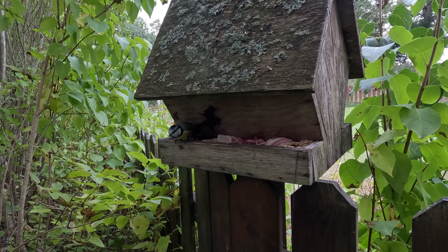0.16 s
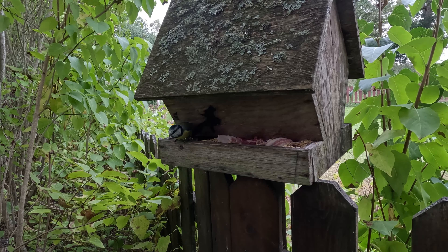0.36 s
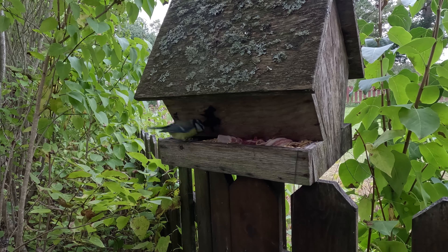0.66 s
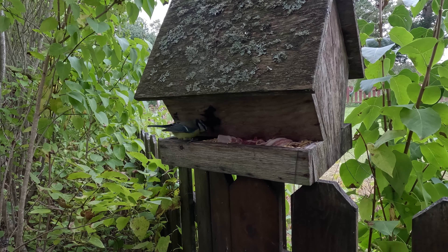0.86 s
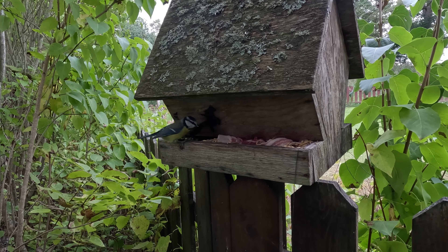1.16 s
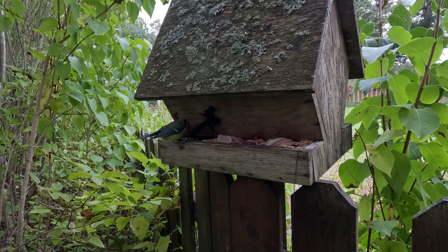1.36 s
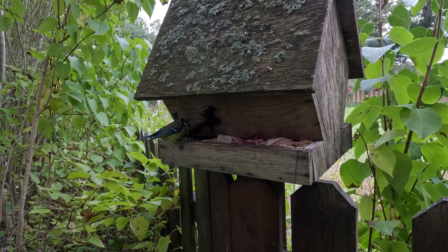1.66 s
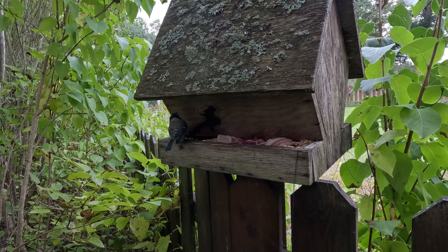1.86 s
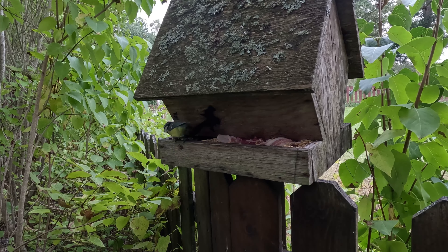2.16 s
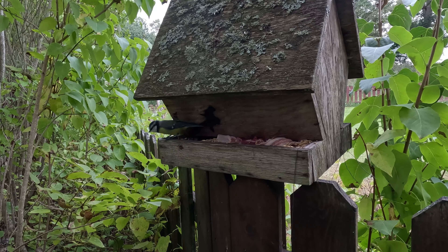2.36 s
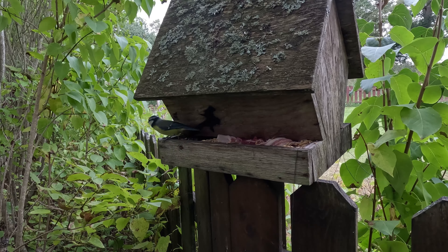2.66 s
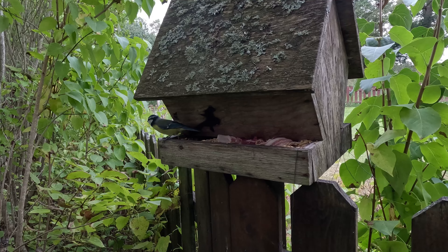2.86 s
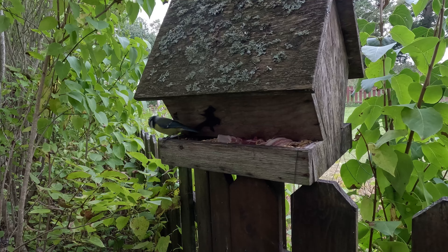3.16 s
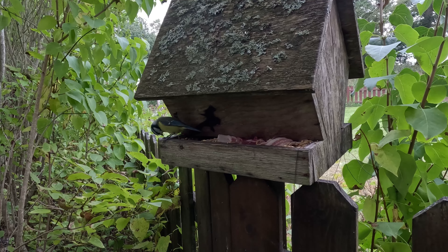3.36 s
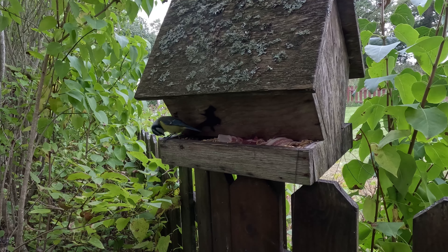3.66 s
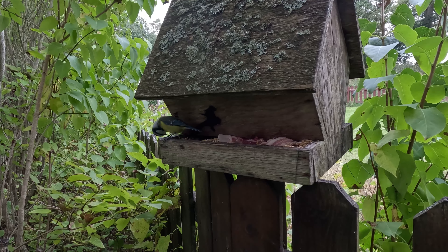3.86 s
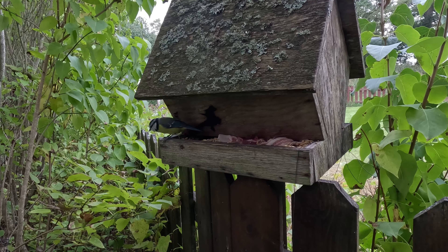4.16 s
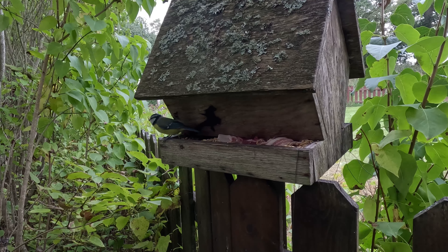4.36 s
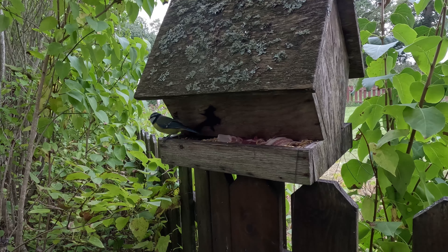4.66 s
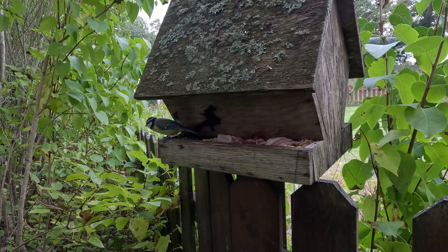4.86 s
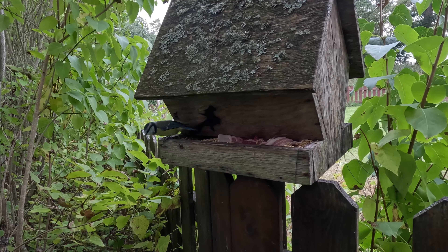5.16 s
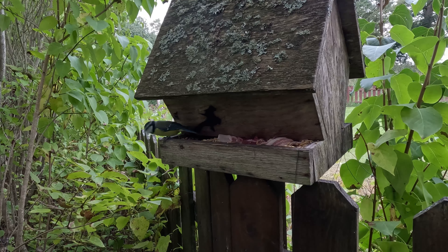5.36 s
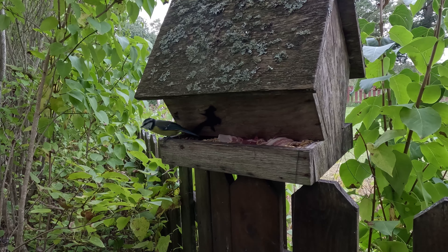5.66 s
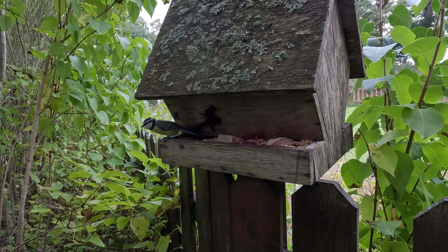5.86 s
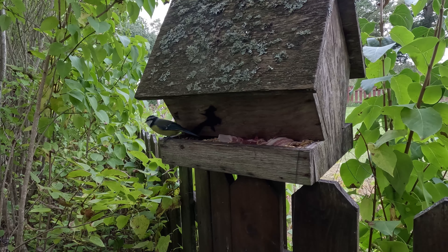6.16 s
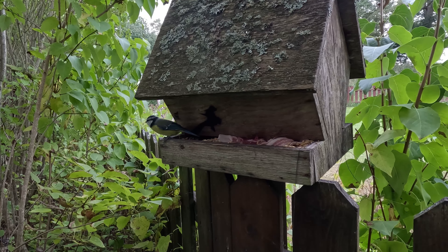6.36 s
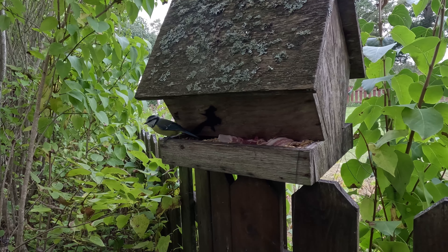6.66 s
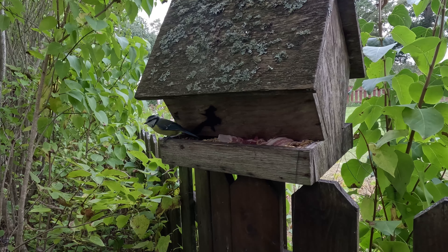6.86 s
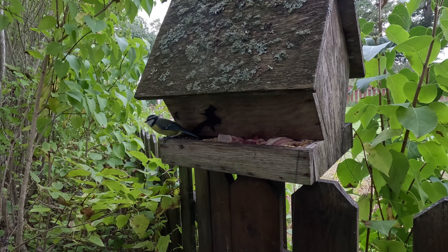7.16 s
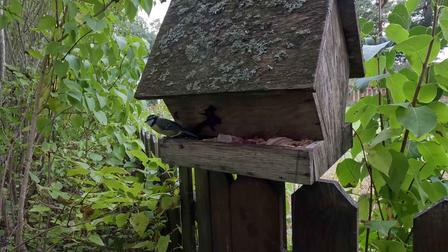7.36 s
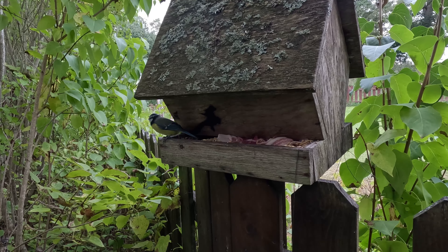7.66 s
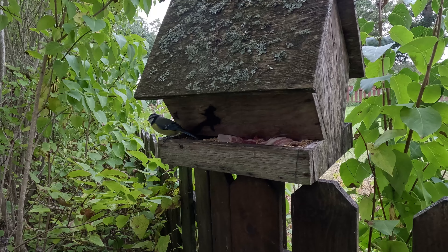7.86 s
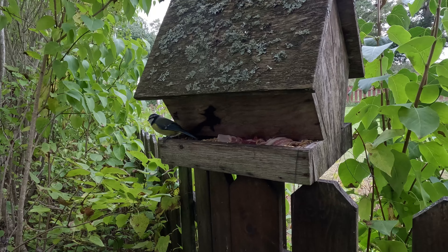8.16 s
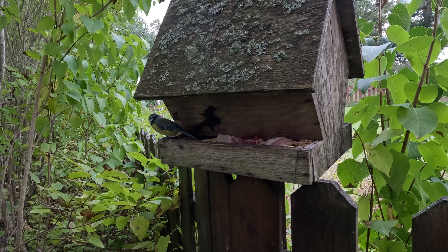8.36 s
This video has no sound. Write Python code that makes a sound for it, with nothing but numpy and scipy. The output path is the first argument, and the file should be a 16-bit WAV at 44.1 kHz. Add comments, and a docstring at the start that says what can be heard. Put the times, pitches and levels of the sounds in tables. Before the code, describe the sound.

Close by in a garden, a small bird pecks at food in a wooden feeder. Each peck is a sharp tick with a brief hollow ring, coming at uneven intervals. Between runs of pecks, feathers rustle, claws scuff the wood and seed husks crack, most busily just past the middle. The pecking pauses, then resumes near the end. Wind on the microphone and feeder jolts add low rumble and soft thumps over faint leaf hiss.

```python
"""Small bird at a wooden feeder

A bird pecks at food close by in a garden. Each peck is a sharp tick followed by the hollow ring of the
wooden box; feathers rustle, claws scuff and seed husks crack. Low rumble and thumps come from wind on the
microphone ports and from the bird shaking the feeder, over the faint hiss of leaves."""
import sys
import numpy as np
from scipy import signal
from scipy.io import wavfile
from scipy.ndimage import uniform_filter1d

SR = 44100
rng = np.random.default_rng(int(sys.argv[2]) if len(sys.argv) > 2 else 0)


def unload_audio(sound):
    """Save the sound as a 16-bit wav file, at the path given as the first command line argument."""
    columns = np.transpose(np.atleast_2d(sound))
    # keep every value between -1 and 1, then stretch to whole-number steps
    steps = np.round(np.clip(columns, -1, 1) * 32767)
    wavfile.write(sys.argv[1], SR, steps.astype(np.int16))


N = 374850


def gain_of(db):
    """Decibels to a gain."""
    return 10 ** (np.asarray(db) / 20)


def unit_rms(x):
    """Scales to rms 1."""
    return x / np.sqrt(np.mean(x ** 2) + 1e-20)


def curve_at(points, hz):
    """Reads a curve on a log-frequency axis."""
    f, value = np.transpose(points)
    return np.interp(np.log(hz + 1), np.log(f + 1), value)


def pan(db):
    """Left and right gains as two rows; positive dB leans left."""
    return gain_of(np.vstack([db, -db]) / 2)


def add(mix, s, sound):
    """Mixes a sound in at s seconds."""
    part = mix[:, round(s * SR):][:, :sound.shape[1]]
    part += sound[:, :part.shape[1]]


def wander(size):
    """Smooth random drift with rms 1, changing over about `size` samples."""
    return unit_rms(uniform_filter1d(uniform_filter1d(rng.standard_normal(N), size), size))


def noise(colour, likeness, tilt, size, patchy_db):
    """Stereo noise with drifting spectral patches, rms 1; `tilt` scales the ports' imbalance."""
    # Each row: frequency in Hz, left over right in dB at a tilt of 1.
    port_tilt = [(60, 36), (240, -13.5), (950, 3), (3770, 2), (15000, 12.5)]
    frames, hz = 4 * N // size + 5, np.fft.rfftfreq(size, 1 / SR)
    a, b, c, d, patches = rng.standard_normal((frames, len(hz), 5)).T
    patches = unit_rms(uniform_filter1d(uniform_filter1d(patches, size=9, axis=0), size=9, axis=1))
    same = np.clip(curve_at(likeness, hz), -1, 1)[:, None]
    left = a + 1j * b
    spectra = np.array([left, same * left + np.sqrt(1 - same ** 2) * (c + 1j * d)])
    spectra *= gain_of(curve_at(colour, hz)[:, None] + patchy_db * patches)
    spectra *= pan(tilt * curve_at(port_tilt, hz))[:, :, None]
    return unit_rms(signal.istft(spectra, nperseg=size, noverlap=3 * size // 4)[1][:, :N])


def leaves():
    """Distant foliage and air: a smooth bed of hiss that swells a little."""
    # Each row: frequency in Hz, relative noise density in dB.
    colour = [(200, -37), (290, -5), (393, -8.5), (710, -11), (1220, -1.5), (2050, -10.5), (5540, -16.5),
              (13000, -38), (16000, -42)]
    # Each row: frequency in Hz, left-right likeness (1 is mono).
    likeness = [(60, 0.72), (380, 0.19), (2380, 0.44), (15000, 1)]
    swell = gain_of(-65 + 0.67 * wander(size=9000))
    return swell * noise(colour, likeness, tilt=1, size=1024, patchy_db=2.0)


def thump(width_ms):
    """One soft push with its rebound, centred on sample 1500."""
    u = np.arange(-1500, 1500) / SR / (width_ms / 1000)
    return (1 - 1.16 * u ** 2) * np.exp(-1.3 * u ** 2)


def wind_and_shaking():
    """Low rumble and thumps from gusts on the ports and from the feeder shaking as the bird hops."""
    # Each row: time in seconds, rumble level in dB, left over right in dB.
    swells = [(0, -31, -8), (0.25, -45.5, -2.5), (0.75, -40, -7.5), (1.1, -44.5, 1), (2.0, -46.5, -1.5),
              (2.85, -40.5, 1.5), (3.05, -58, -7), (3.3, -41, -4), (3.79, -49.5, -2), (3.85, -31.5, -8),
              (4.75, -45, 0.5), (6.1, -36, -4.5), (6.25, -44, -2.5), (7.42, -46.5, -3), (7.55, -39.5, -6.5),
              (8.1, -36, -7.5), (8.5, -32.5, -3)]
    # Each row: frequency in Hz, relative noise density in dB.
    colour = [(15, 5), (45, -0.5), (90, -9.5), (200, -21), (330, -40.5), (700, -90)]
    # Wind buffets and feeder jolts. Each row: time in seconds, peak in dB, width in milliseconds.
    thumps = [(0.061, -27, 4.9), (0.161, -22, 3.5), (0.437, -25.5, 8.2), (0.734, -24.5, 2.16),
              (0.759, -19.5, 11), (2.405, -39, 2.8), (2.419, -32, 2.4), (2.491, -29.5, 1.9),
              (2.798, -34, 2.6), (2.848, -33, 3.1), (3.855, -31.5, 2.3), (3.955, -29, 2.86),
              (3.999, -27.5, 3.4), (4.25, -23, 5.9), (4.268, -22, 5), (5.763, -28.5, 2.3),
              (6.087, -25.5, 12.6), (7.54, -22, 10), (7.704, -26.5, 3.7), (7.935, -25, 2.67),
              (8.03, -19, 2.44), (8.052, -21.5, 19), (8.095, -19, 3.8), (8.12, -24, 2.83),
              (8.351, -21, 4.7), (8.465, -24.5, 4.2)]
    t = np.arange(N) / SR
    s, db, pan_db = np.transpose(swells)
    lumps = unit_rms(gain_of(2.5 * wander(size=900)))
    rumble = lumps * noise(colour, likeness=[(20, 1.0), (300, 0.41)], tilt=0, size=4096, patchy_db=3.0)
    pushes = rng.standard_normal(N) * (rng.random(N) < 35 / SR)  # about 35 a second
    kind = rng.integers(0, 3, N)
    bumps = sum(signal.oaconvolve(pushes * (kind == k), thump(width_ms), "same")
                for k, width_ms in enumerate((4.5, 7.5, 11)))
    out = gain_of(np.interp(t, s, db)) * (rumble + gain_of(-5.5) * unit_rms(bumps))
    for at, peak_db, width_ms in thumps:
        add(out, at - 1500 / SR, gain_of(peak_db) * thump(width_ms)[None])
    return out * pan(np.interp(t, s, pan_db))


def movement():
    """Two envelopes, rustle then flapping: each bout swells, sags while it lasts and dies away."""
    # Each row: start in seconds, length in seconds, rustle level in dB, flap level in dB.
    bouts = [(0, 0.082, -51, -70), (0.707, 0.12, -65, -59), (0.96, 0.35, -59, -68),
             (2.013, 0.063, -58, -67), (2.108, 0.2, -55.5, -58), (2.308, 0.23, -51, -59.5),
             (2.56, 0.15, -61.5, -68.5), (2.746, 0.13, -54.5, -61.5), (2.887, 1, -58, -71.5),
             (4.079, 0.077, -48.5, -68), (5.103, 0.21, -39.5, -50.5), (5.349, 0.19, -49.5, -51),
             (5.576, 0.21, -44, -55), (5.75, 0.28, -56.5, -75), (7.675, 0.038, -48, -49.5)]
    swell_s, sag_db_per_s, release_db_per_s = [[0.065], [0.1]], [[47.5], [21.5]], 292
    level = np.ones((2, N)) * gain_of([[-72.5], [-77]])  # the bird is never quite still
    t = np.arange(SR) / SR
    swell = np.sin(np.pi / 2 * np.minimum(t / swell_s, 1)) ** 2
    for s, length, db, flap_db in bouts:
        fall_db = t * sag_db_per_s + release_db_per_s * np.maximum(t - length, 0)
        add(level, s, swell * gain_of([[db], [flap_db]] - fall_db))
    return level


def crackle(per_s, low_hz, top_hz):
    """Small snaps and taps: sparse grains of a few cycles at eight pitches, rms 1."""
    out = np.zeros((2, N))
    hits = np.minimum(rng.standard_normal(N) ** 2, 4.0) * (rng.random(N) < per_s / SR)
    kind = rng.integers(0, 8, N)
    for k, hz in enumerate(np.geomspace(low_hz, top_hz, 8)):
        t = np.arange(int(3.2 * SR / hz)) / SR
        grain = np.sin(2 * np.pi * hz * t) * np.hanning(len(t))
        out += signal.oaconvolve(hits * (kind == k), grain)[:N] * pan(rng.normal(4.4, 25.0))
    return unit_rms(out)


def box_ring(spread):
    """The hollow wooden box after one blow; its modes, mostly the upper ones, vary with the spot struck."""
    # Each row: pitch in Hz, level in dB, seconds to fall by 60 dB.
    modes = [(147.9, 6, 0.2), (200, 3.5, 0.19), (476, -5.5, 0.033), (342, -10, 0.049), (1086, -12.5, 0.066)]
    t, ring = np.arange(12000) / SR, 0
    for k, (hz, db, t60) in enumerate(modes):
        spot_db, detune_percent = rng.normal(0, spread, 2) * (1 if k > 1 else .3)
        polarity = -1 if k == 1 else 1  # the two low modes start opposed: the ring swells, then beats
        tone = np.sin(2 * np.pi * hz * (1 + detune_percent / 100) * t)
        ring += polarity * gain_of(db + spot_db - 60 * t / t60) * tone
    return ring * pan(-5.5)  # the right port hears the walls louder


def rustle():
    """Feathers and claws: noise in clumps of a few milliseconds, with duller flaps that shake the box."""
    # Each row: frequency in Hz, relative density of the feather noise in dB.
    feather_colour = [(530, -95), (900, -5), (1600, -5), (2960, -4), (4600, -5.5), (7310, -2),
                      (12000, -23.5), (16000, -28)]
    # Each row: frequency in Hz, relative density of the flap noise in dB.
    flap_colour = [(130, -3.5), (260, -2.5), (600, -9.5), (1000, -15.5), (1800, -7.5), (4000, -47)]
    # Each row: frequency in Hz, left-right likeness (1 is mono).
    likeness = [(60, 1), (380, 0.92), (2380, 0.82), (15000, 0.74)]
    (feather_level, flap_level), clumps = movement(), wander(size=180)
    feather_level *= unit_rms(gain_of(2.15 * clumps + 1.5 * wander(size=30)))
    flap_level *= unit_rms(gain_of(4.34 * clumps))
    husks = gain_of(-11) * feather_level * crackle(per_s=700, low_hz=2490, top_hz=7340)
    claw_taps = gain_of(-10) * flap_level * crackle(per_s=250, low_hz=408, top_hz=1760)
    scrapes, surges = scrapes_and_crunches()
    feather_level += surges[0]
    flap_level += surges[1]
    feathers = feather_level * noise(feather_colour, likeness, tilt=0.27, size=256, patchy_db=2.0)
    flaps = flap_level * noise(flap_colour, likeness, tilt=0.13, size=512, patchy_db=1.0)
    shaking = flap_level * rng.standard_normal((1, N))
    box = signal.fftconvolve(shaking, box_ring(spread=0), axes=1)[:, :N]
    return husks + claw_taps + scrapes + feathers + flaps + gain_of(-34) * box


def scrapes_and_crunches():
    """Short scrapes and crunches of claws, wings and cracking husks, plus their rustle and flap surges."""
    # Each row: time in seconds, scrape gain in dB, low-end gain in dB, decay in milliseconds, pitch in Hz.
    bursts = [(0.0304, -41, -64, 4.4, 2110), (0.114, -43.5, -70, 5.6, 1360), (1.03, -47, -75, 8.8, 2020),
              (1.075, -45, -75, 4.9, 4380), (1.2297, -49, -77, 7.6, 7000), (1.516, -38, -80, 3.5, 7900),
              (2.151, -48, -44, 1.8, 1550), (2.228, -34, -40, 5.8, 1080), (2.257, -45.5, -44, 3.7, 7500),
              (2.3691, -34, -42, 3.5, 6060), (2.3795, -37, -39, 2.5, 1590),
              (2.3937, -46.5, -37.5, 6.7, 1940), (2.4469, -34.5, -48, 9.6, 6400),
              (2.651, -47, -50, 10.4, 1600), (2.796, -67, -44.5, 5.1, 1200), (3.6082, -43, -67, 6.7, 3600),
              (5.185, -38, -38, 9.9, 6700), (5.223, -42, -37, 5.3, 2780), (5.2685, -35.5, -32.5, 3.7, 2490),
              (5.2988, -33.5, -39, 6.9, 810), (5.314, -45, -50, 2.2, 5500), (5.343, -42, -37, 3.9, 5500),
              (5.41, -43.5, -46, 5.3, 1980), (5.4417, -38, -56, 7.1, 1610), (5.45, -39, -34, 4.4, 690),
              (5.5306, -35, -64, 6.5, 6000), (5.537, -40, -63, 13, 6800), (5.715, -53.5, -36, 4, 1200),
              (5.647, -44.5, -46, 22, 6100), (5.737, -37, -48, 6, 1280), (5.7681, -37, -34, 3.9, 1510),
              (5.923, -42, -41.5, 4.6, 2800), (8.247, -44, -85, 6.5, 8400)]
    out, surges = np.zeros((2, 2, N))
    t = np.arange(3000) / SR
    for s, db, low_db, decay_ms, hz in bursts:
        u, start = t * 1000 / decay_ms, max(s - .0015, 0)
        envelope = (1 - np.exp(-u / 0.31)) * np.exp(-u)  # quick build, slower fall
        add(surges, start, gain_of([[db], [low_db]]) * envelope)
        band = signal.butter(2, [hz / 1.14, hz * 1.225], "bandpass", fs=SR, output="sos")
        scrape = unit_rms(signal.sosfilt(band, rng.standard_normal(len(t))))
        jerks = gain_of(4 * uniform_filter1d(rng.standard_normal(len(t) // 30).repeat(30), 20))
        add(out, start, gain_of(db) * envelope * scrape * jerks * pan(2.8))
        add(out, start, gain_of(low_db) * thump(width_ms=2.2)[1300:] * pan(-0.3))  # the tray is jolted
    return out, surges


def claws():
    """Claws and seed husks tick on the wood: a short blip with a faint gritty trail at the same pitch."""
    # Each row: start in seconds, level in dB, pitch in Hz.
    ticks = [(0.086, -41, 7700), (1.416, -48, 7800), (1.4288, -42.5, 1190), (1.657, -56, 9400),
             (1.689, -58, 12500), (1.835, -47.5, 7000), (1.935, -47, 7160), (2.033, -49, 6500),
             (2.06, -43, 7580), (2.072, -41, 5460), (2.15, -44, 7640), (2.549, -44, 7900),
             (2.9062, -40.5, 4450), (2.9344, -38, 3580), (3.011, -43, 5000), (4.068, -45, 5070),
             (4.528, -44.5, 6950), (4.908, -51.5, 6960), (5.1616, -30, 5130), (5.1843, -26, 4200),
             (5.3344, -37, 5770), (5.8606, -42, 5800), (6.575, -57, 9300), (7.857, -44, 5830)]
    out, t = np.zeros((2, N)), np.arange(900) / SR
    for s, db, hz in ticks:
        blip = np.sin(2 * np.pi * hz * t) * np.exp(-((t - .001) / 0.00042) ** 2)
        band = signal.butter(2, [hz / 1.36, min(hz * 1.3, SR / 2.5)], "bandpass", fs=SR, output="sos")
        grit = unit_rms(signal.sosfilt(band, rng.standard_normal((2, len(t)))))
        trail = grit * gain_of(-10 - 60 * t / 0.064)
        add(out, s, gain_of(db) * (blip + trail) * pan(2.5))
    return out


def beak_tick(hz, treble_db):
    """The beak lands: a brief knock, a bright snap, a fence echo and scatter from box and leaves."""
    t = np.arange(4000) / SR
    age, echo_s = t - .0009, .0101  # age counts from the moment of impact
    envelope = np.exp(-(age * hz / 0.53) ** 2) + 0.25 * (age > 0) * np.exp(-age * hz / 3.0)
    knock = np.sin(2 * np.pi * hz * age) * envelope * pan(13)  # the left port faces the beak
    grit = rng.standard_normal((len(t), 6)).T
    band = signal.butter(3, [4300, 9000], "bandpass", fs=SR, output="sos")
    snap = signal.sosfilt(band, grit[0] + 2.2 * grit[:2]) * np.exp(-(age / 0.00061) ** 2)
    snap *= 2 / abs(snap).max(1, keepdims=True)
    hard_tip = np.sin(2 * np.pi * 11500 * t) * np.exp(-(age / 0.00011) ** 2) * pan(27)
    direct = knock + gain_of(treble_db) * (snap + gain_of(-10) * hard_tip)
    thinned = np.diff(uniform_filter1d(direct, size=3, axis=1), prepend=0)
    echo = gain_of(-15) * np.roll(thinned, round(echo_s * SR), axis=1)
    box_response = gain_of(-23.5 - 60 * t / 0.019) * (t > .001) * grit[2:4]
    box = signal.fftconvolve(direct, box_response, axes=1)[:, :len(t)]
    tail = (t > .0015) * gain_of(treble_db - 11.5 - 60 * t / 0.084)
    scatter = tail * unit_rms(signal.sosfilt(band, grit[4:]))
    return direct + echo + box + scatter


def pecks():
    """Every peck is a beak tick that also rings the box."""
    # Each row: start in seconds, tick level in dB, pitch in Hz, relative treble in dB, ring level in dB.
    blows = [(0.7971, -42, 1570, -4, -55), (0.9488, -39, 2950, -8, -49), (1.3446, -38, 2430, -9, -44),
             (1.5174, -16, 4960, -9.5, -47.5), (2.7578, -44.5, 2260, 1, -57),
             (3.124, -41.5, 2980, -7, -52.5), (3.4557, -36, 2830, -10, -48.5),
             (3.601, -29.5, 3170, -15, -47), (4.12, -33, 2920, -5.5, -48.5),
             (4.2784, -25.5, 4600, -10, -39), (4.4723, -33.5, 2340, 1, -40), (4.779, -30, 2000, -4, -44),
             (4.997, -36, 1800, 0.5, -40), (7.3932, -26, 2490, -17, -50.5), (7.5537, -28, 3520, -11.5, -45),
             (7.7364, -28.5, 2980, -3.5, -40), (8.0665, -28, 3280, -5, -36), (8.249, -27.5, 1930, -9, -38)]
    ring_delay_s = .0032  # the blow travels through the wood before the walls move
    out = np.zeros((2, N))
    for s, db, hz, treble_db, ring_db in blows:
        add(out, s, gain_of(db) * beak_tick(hz, treble_db))
        add(out, s + ring_delay_s, gain_of(ring_db) * box_ring(spread=3.0))
    return out


def scene():
    """The bird on its box up front, with low rumble over a bed of leaves."""
    return pecks() + claws() + rustle() + wind_and_shaking() + leaves()


def record(dry):
    """The microphone loses the deepest bass and the highest treble, ending in a steep band limit."""
    dry = signal.sosfilt(signal.butter(1, 14, "highpass", fs=SR, output="sos"), dry)
    dry = signal.sosfilt(signal.butter(2, 13700, fs=SR, output="sos"), dry)
    band_limit = signal.firwin(511, 16100, window=("kaiser", 9), fs=SR)
    return signal.oaconvolve(dry, band_limit[None], "same")


dry = scene()
out = record(dry)
unload_audio(out)
```